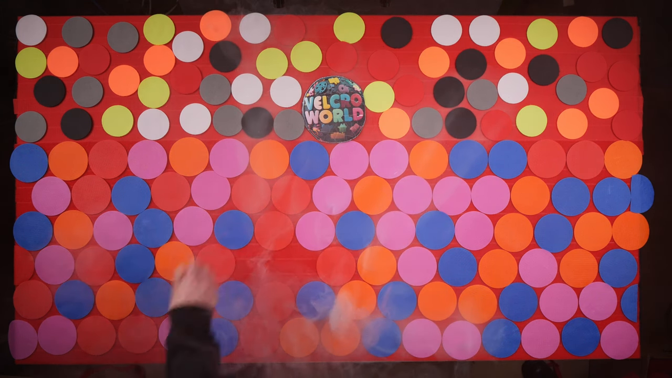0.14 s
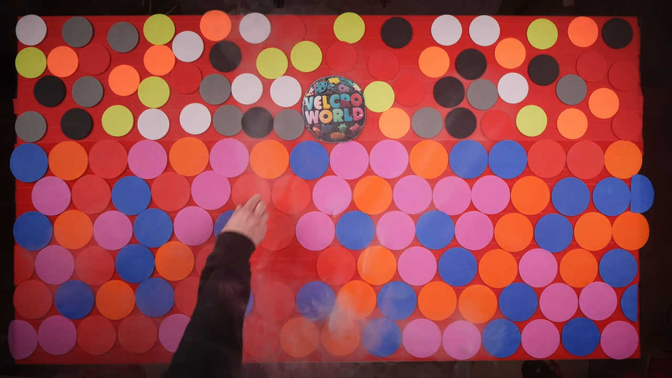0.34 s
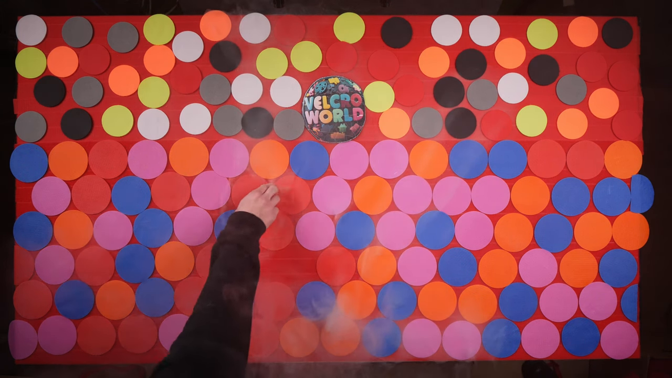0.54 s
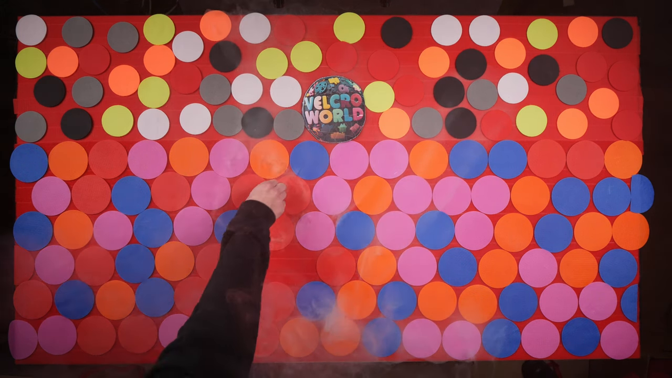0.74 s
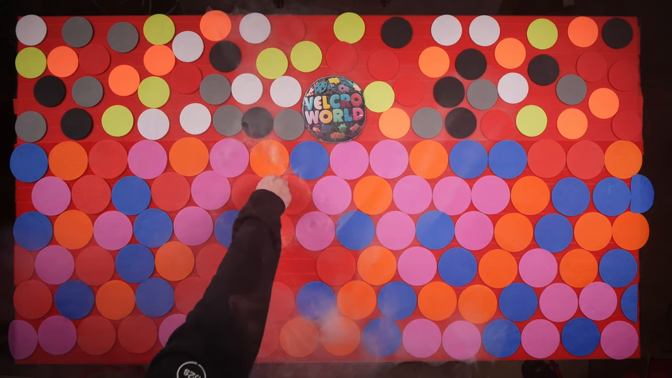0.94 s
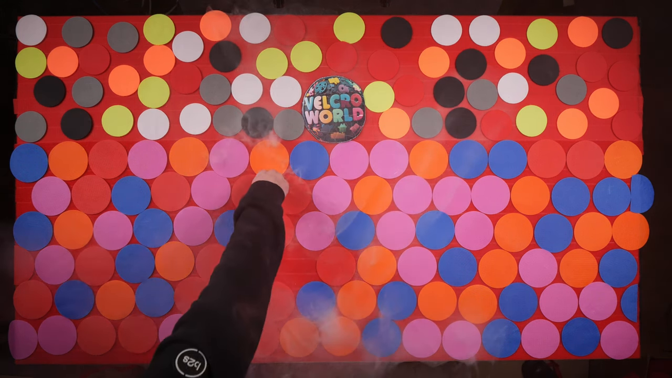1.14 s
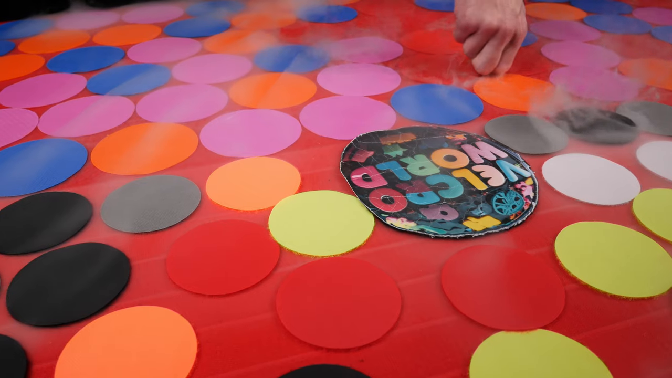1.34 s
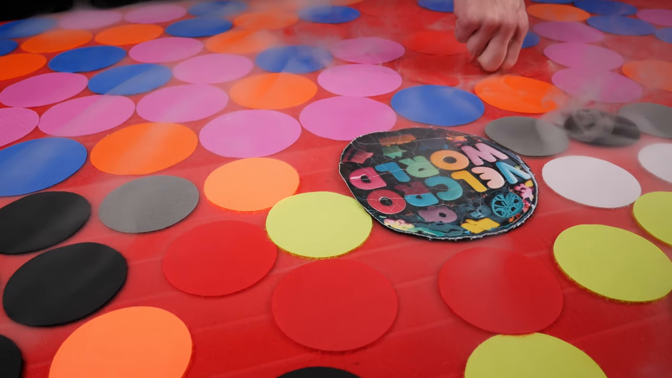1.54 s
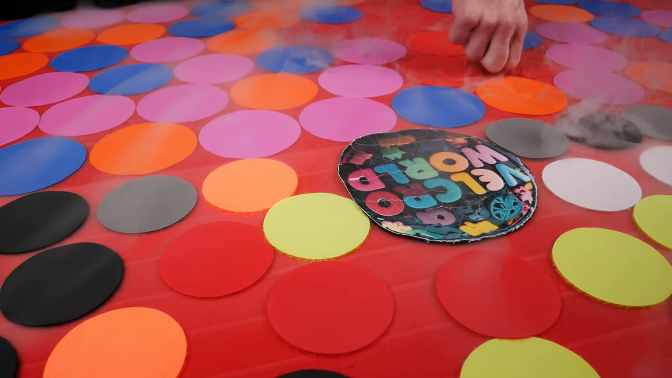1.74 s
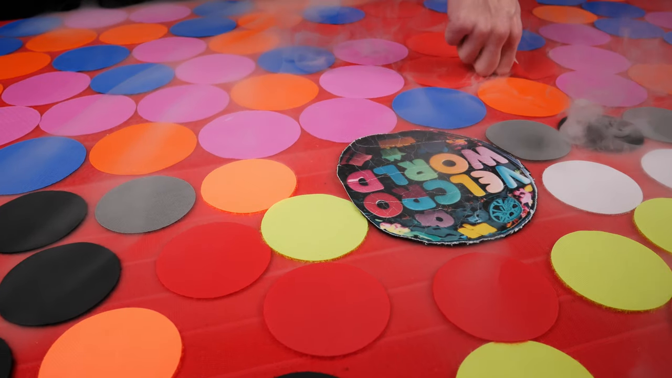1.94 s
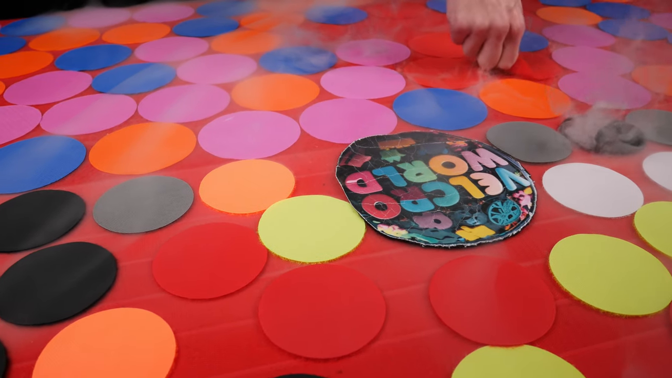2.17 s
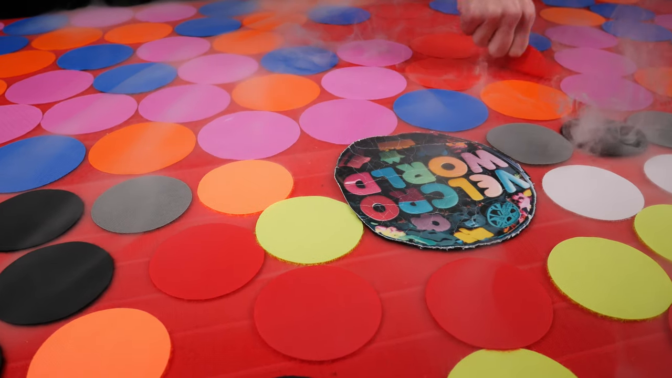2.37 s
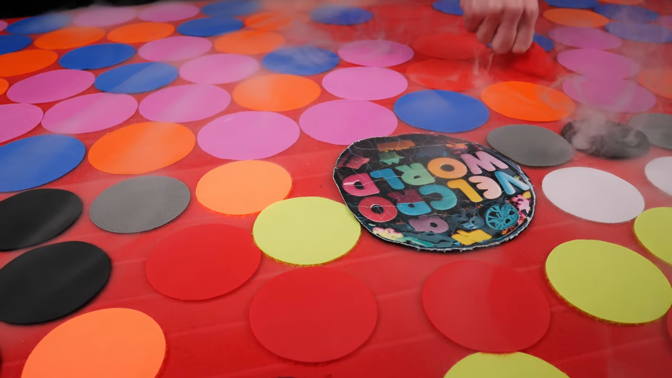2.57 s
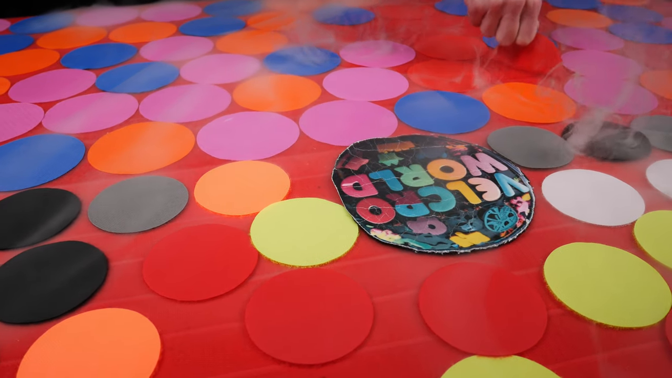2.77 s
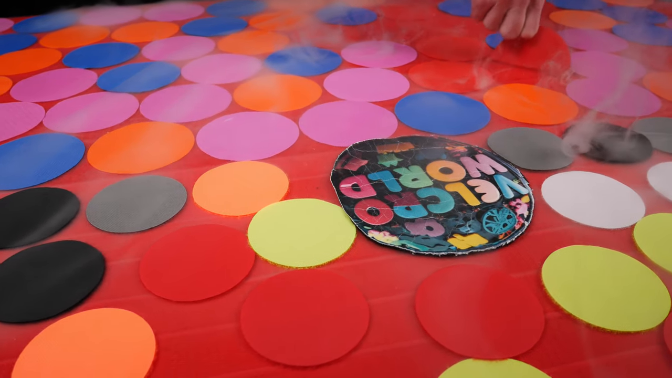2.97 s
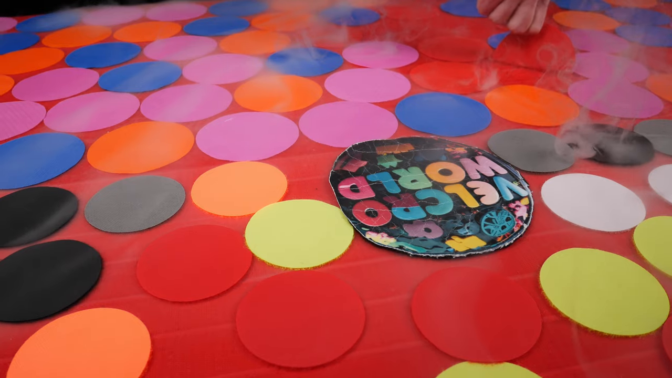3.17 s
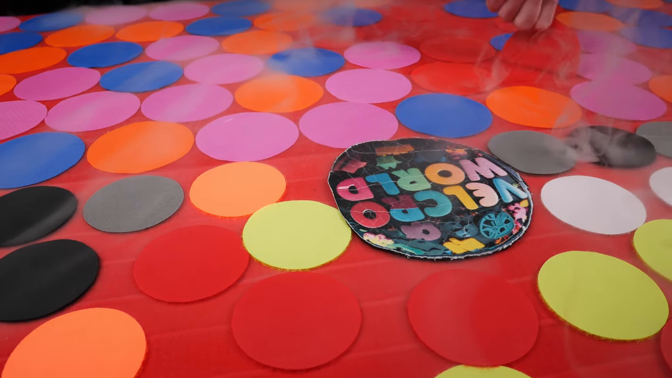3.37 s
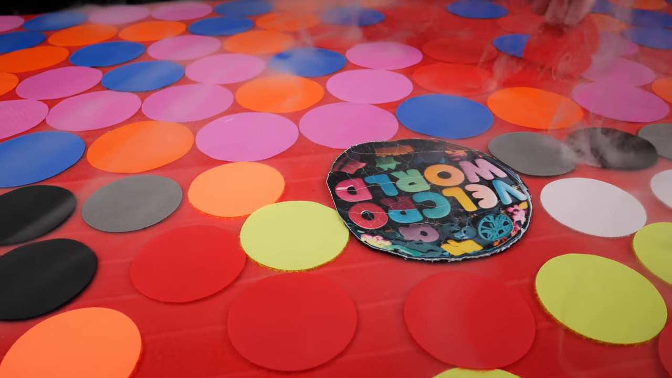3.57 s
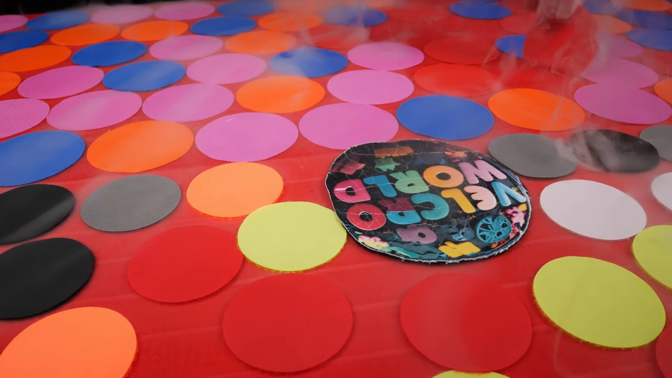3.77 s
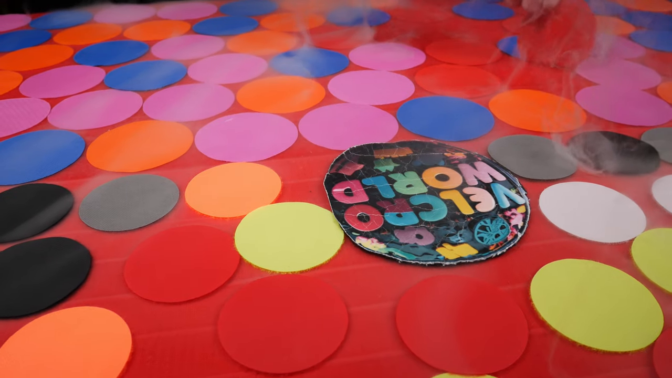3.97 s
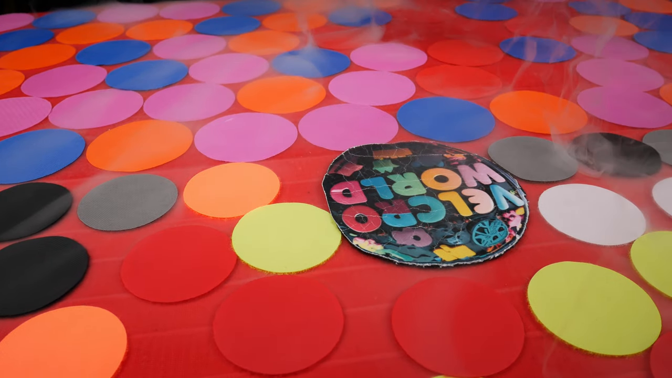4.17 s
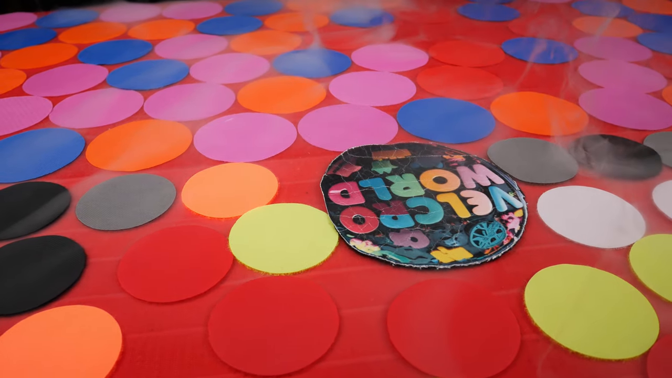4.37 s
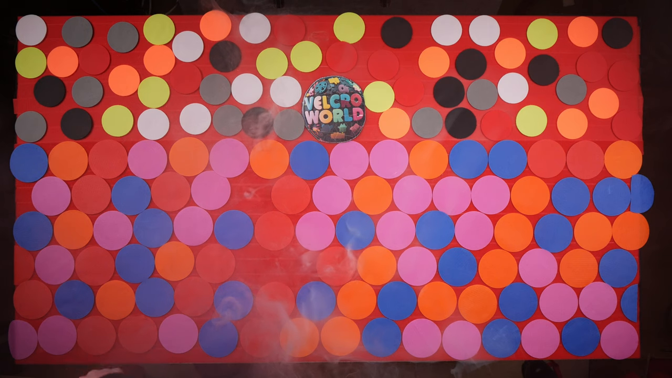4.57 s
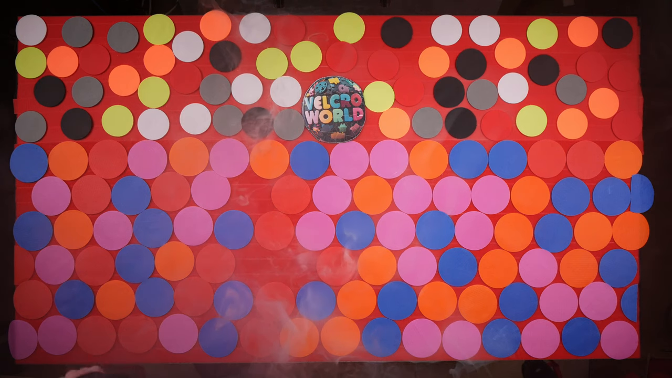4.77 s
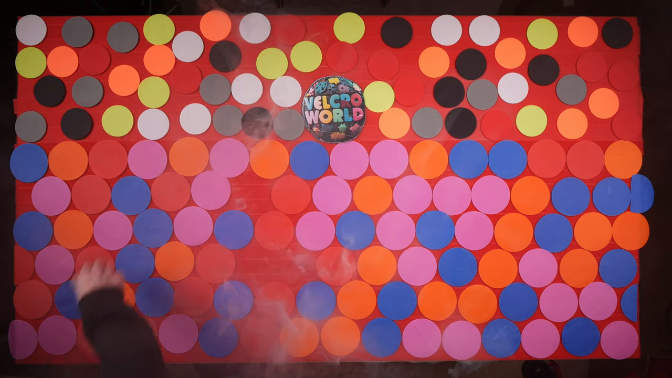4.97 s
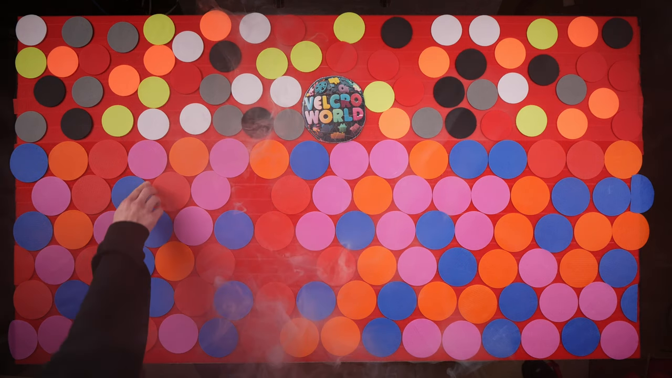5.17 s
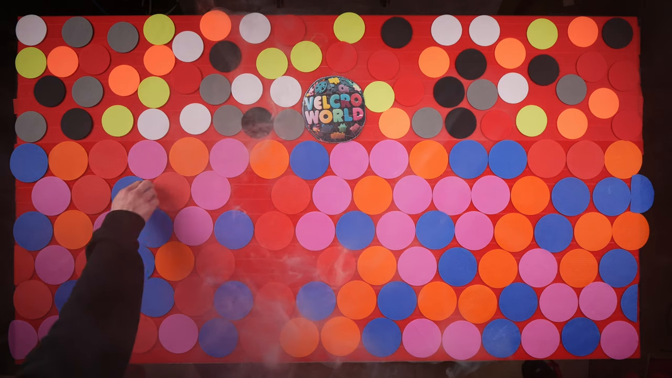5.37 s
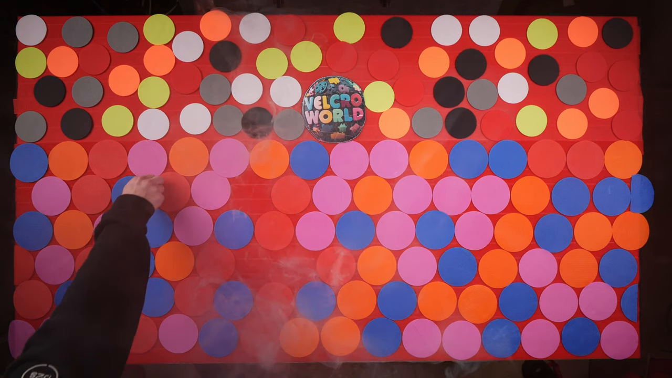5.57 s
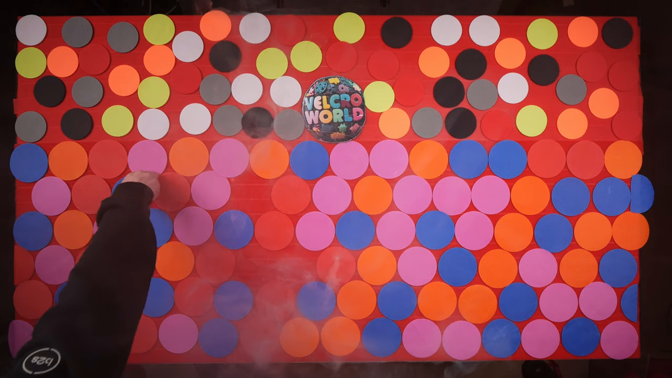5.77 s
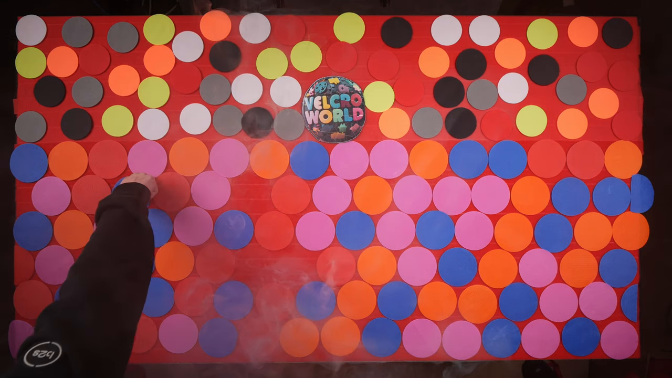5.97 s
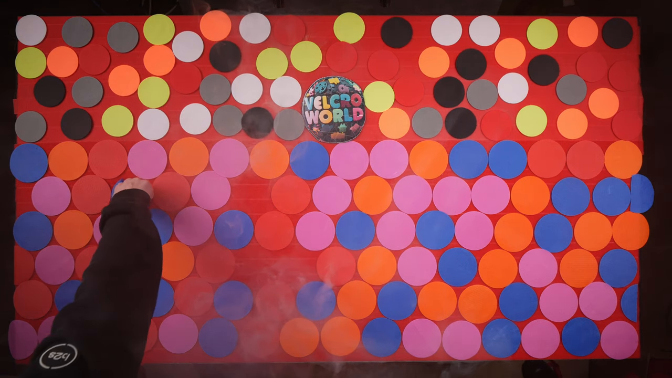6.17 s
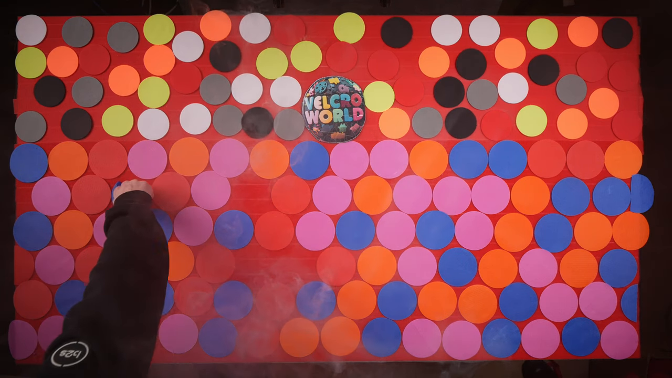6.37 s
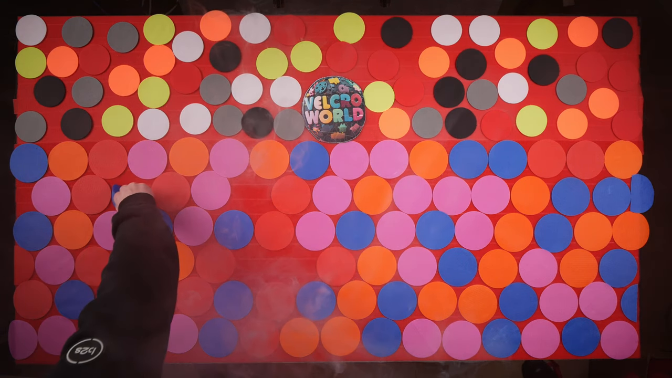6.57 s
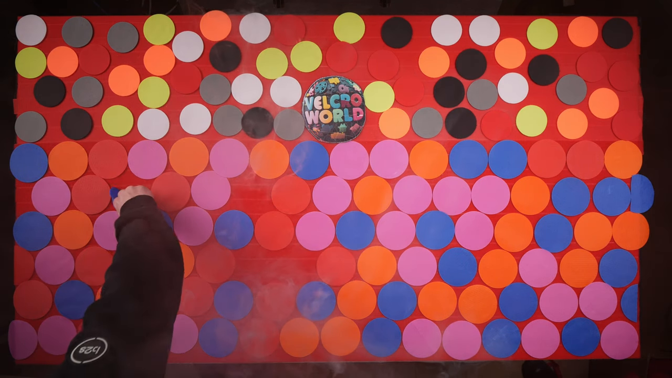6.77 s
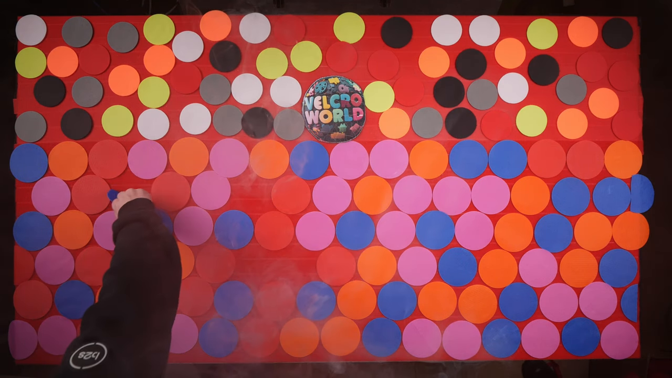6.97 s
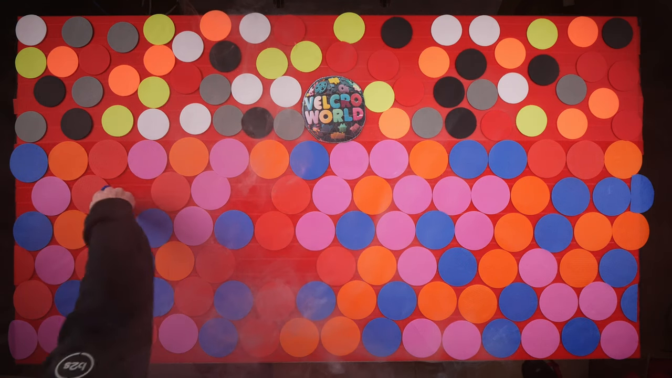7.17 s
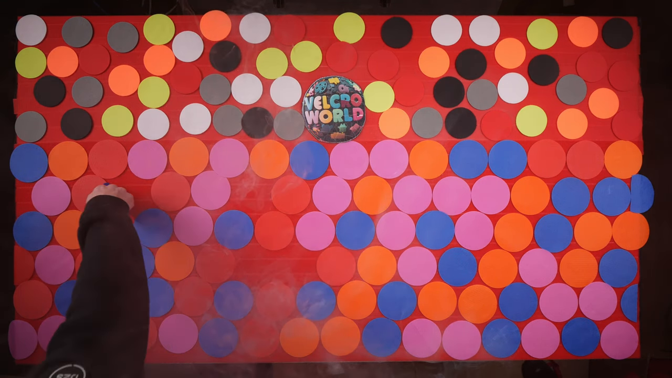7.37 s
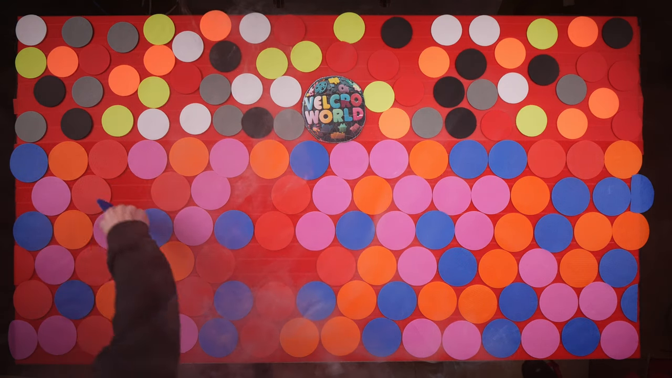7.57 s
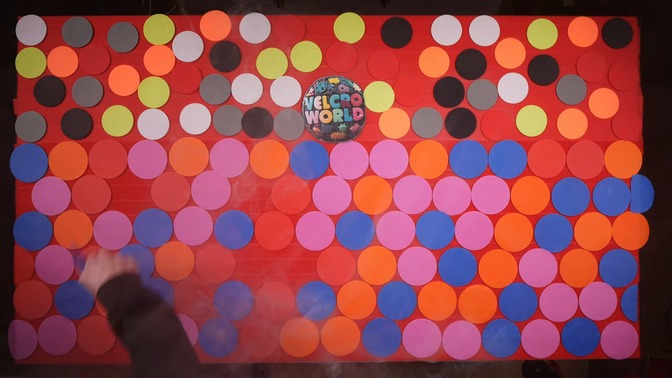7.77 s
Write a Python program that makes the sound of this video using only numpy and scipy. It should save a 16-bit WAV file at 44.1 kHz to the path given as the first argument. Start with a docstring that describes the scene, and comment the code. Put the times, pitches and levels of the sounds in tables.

```python
"""Faint rubbing and stray ticks, then the rasp of round hook-and-loop patches peeled off a board in
short pulls, close to two spaced microphones in a small dry room. Every hook that lets go snaps; the
lifted flap radiates lower as it grows, and the pocket under it rings in falling glides. The board thuds
and sways, and fingertips and a sleeve rustle between the pulls."""
import sys
import numpy as np
from scipy import signal
from scipy.fft import rfft, irfft
from scipy.io import wavfile
from scipy.ndimage import uniform_filter1d

SR = 44100
rng = np.random.default_rng(int(sys.argv[2]) if len(sys.argv) > 2 else 0)


def store_pcm(level_fs):
    """Save levels as 16-bit WAV."""
    pcm = np.round(np.clip(level_fs, -1, 1) * 32767).astype(np.int16)
    wavfile.write(sys.argv[1], SR, np.atleast_2d(pcm).T)


N = 345303
T = np.arange(N) / SR


def gain_of(db):
    """Decibels to gain."""
    return 10 ** (np.asarray(db) / 20)


def unit_rms(x):
    """Scales to rms 1."""
    return x / np.sqrt(np.mean(x ** 2) + 1e-20)


def at_hz(table, hz):
    """Value of a spectrum table at hz."""
    freq_hz, value = np.transpose(table)
    return np.interp(np.log(hz + 1), np.log(freq_hz + 1), value)


def curves(rows, t):
    """Columns of a table at the times t."""
    time_s, *columns = np.transpose(rows)
    return [np.interp(t, time_s, column) for column in columns]


def envelope(events):
    """Gain of several (time_s, level_db) lists on one time line, silent between them."""
    gain = np.full(N, 1e-10)
    for rows in events:
        span = slice(*np.searchsorted(T, [rows[0][0], rows[-1][0]]))
        gain[span] = np.maximum(gain[span], gain_of(curves(rows, T[span])[0]))
    return gain


def shortest_impulse(db):
    """Minimum-phase impulse of energy 1 with the spectrum db on 1025 bins."""
    log_gain = np.log(gain_of(np.concatenate([db, db[-2:0:-1]])))
    impulse = np.fft.ifft(np.exp(np.conj(signal.hilbert(log_gain)))).real[:1024]
    return impulse / np.linalg.norm(impulse)


def noise_pair(spectrum, alike):
    """Noise of one spectrum, partly alike at the two microphones."""
    left, other = rng.standard_normal((2, N))
    right = alike * left + np.sqrt(1 - alike ** 2) * other
    tone = gain_of(at_hz(spectrum, np.fft.rfftfreq(N, 1 / SR)))
    return unit_rms(irfft(rfft([left, right]) * tone, N))


# The quiet room all around the microphones: freq_hz, density_db
AIR_SPECTRUM = [(26, -39), (45, -20), (96, -17), (158, -15.5), (174, -31), (245, -19.5), (476, -30),
                (741, -40), (16000, -53.5)]

def room_air():
    """A steady, very faint rumble and hiss."""
    return gain_of(-87.5) * noise_pair(AIR_SPECTRUM, alike=0.74)


# Decay of the small room around the board: freq_hz, t60_s
ROOM_DECAY = [(200, 0.24), (1000, 0.089), (4000, 0.11), (9000, 0.045), (14000, 0.033)]

def room_reflections(direct):
    """The walls return sparse echoes of random sign, each band dying at its own speed."""
    length = SR // 3
    taps = np.zeros((2, length))
    at = np.arange(60, length - 20, 20) + rng.integers(0, 20, (2, (length - 61) // 20))
    np.put_along_axis(taps, at, rng.choice([-1., 1.], at.shape), 1)
    hz, t, bands = signal.stft(taps, SR, nperseg=128)
    decay = gain_of(-60 * t / at_hz(ROOM_DECAY, hz)[:, None])
    tail = signal.istft(bands * decay, SR, nperseg=128)[1]
    upper = signal.lfilter(*signal.butter(2, 500, "high", fs=SR), direct)  # the bass stays close and dry
    return signal.fftconvolve(upper, tail / np.linalg.norm(tail[0]), axes=1)[:, :N]


# Where the peeling edge sits between the microphones: time_s, right_lag_ms, left_lead_db
EDGE_PLACES = [(.7, 0.2, 0.5), (2.1, .2, -1.5), (3.6, 0.27, 1.5), (4.4, .25, -.5), (5.3, .39, 1),
               (6.1, 0.41, 2), (7.8, .44, 2)]

def edge_place(t):
    """Lag in samples at the right microphone and extra dB at the left, at the times t."""
    lag_ms, lead_db = curves(EDGE_PLACES, t)
    return lag_ms * SR / 1000, lead_db


# Faint rubs at the board that swell and fade: on_s, fade_from_s, off_s, level_db
# With fade_from_s before on_s a rub only fades; with off_s before on_s it is silent.
RUBS = [(0.514, 0.51, 1.1, -78), (0.719, 0.715, 1.14, -69), (0.915, 0.95, 1.5, -73),
        (1.075, 1.09, 1.6, -60.5), (1.74, 1.73, 5.8, -73), (4.24, 4.3, 4.48, -67.5),
        (4.441, 4.448, 4.55, -70.5), (4.695, 4.774, 4.98, -61), (5.383, 5.402, 5.45, -73.5),
        (5.473, 5.497, 5.8, -71), (7.7, 7.71, 8.04, -65.5), (7.74, 7.832, 6.2, -66)]
# Sleeve cloth at the microphones: freq_hz, density_db
CLOTH_SPECTRUM = [(120, -58), (200, -21), (529, -14), (647, -3.5), (867, -32.5), (933, -4), (6170, -3),
                  (16000, -17.5)]
# Fingertips at the microphones: freq_hz, density_db
SKIN_SPECTRUM = [(410, -55), (700, -19), (1620, -16), (2080, -5), (3790, -15), (5190, -8), (16000, -25)]

def rustle(sleeve_from_s=4.6, sleeve_to_s=5.1):
    """Cloth or skin rubs: noise that flickers in short grains, later and softer on the right."""
    grain = gain_of(4.6 * unit_rms(uniform_filter1d(rng.standard_normal(N), 150)))
    cloth, skin = noise_pair(CLOTH_SPECTRUM, alike=0.4), noise_pair(SKIN_SPECTRUM, alike=0.62)
    rub = np.where((T > sleeve_from_s) & (T < sleeve_to_s), cloth, skin)
    level = envelope([[(on, db - 8), (fade, db), (off, db - 30)] for on, fade, off, db in RUBS])
    left, right = uniform_filter1d(level, 60) * unit_rms(grain) * rub
    lag, _ = edge_place(T)
    delayed = np.maximum(np.arange(N) - np.round(lag).astype(int), 0)
    return np.array([left * gain_of(6.0), right[delayed] * gain_of(4.5)])


# Swells of the board's deep rumble, close to the microphones: time_s, level_db
RUMBLE_SWELLS = [(0.028, -65), (0.529, -47), (0.98, -51), (1.33, -46.5), (1.55, -38), (1.98, -50),
                 (2.44, -31.5), (2.57, -35), (2.76, -40), (3.03, -36), (3.15, -42), (3.56, -33.5),
                 (3.75, -33), (4.0, -27.5), (4.13, -21), (4.85, -65), (5.36, -59), (5.75, -59), (6.13, -37),
                 (6.27, -35), (7.07, -35), (7.33, -33.5), (7.6, -37), (7.76, -40.5)]
# The board's wobble, nearly the same at both microphones: freq_hz, density_db
SWAY_SPECTRUM = [(12, -15), (22, -1.5), (29, 16), (36, -1.5), (45, -9), (55, -2.5), (75, -20.5), (120, -53)]

def board_sway(fall_db_per_s=80, rise_s=0.07, rest_db=-73.5):
    """Deep wobble of the board: it rises with the pulls and the listed swells and dies slowly."""
    drive_db = 20 * np.log10(pull_force()) - 21  # well below the crackle
    time_s, level_db = np.transpose(RUMBLE_SWELLS)
    drive_db[np.minimum(np.round(time_s * SR).astype(int), N - 1)] = level_db
    fall_db = fall_db_per_s * T
    held = gain_of(np.maximum.accumulate(drive_db + fall_db) - fall_db) + gain_of(rest_db)
    wobble = noise_pair(SWAY_SPECTRUM, alike=0.985)
    return uniform_filter1d(held, round(rise_s * SR)) * wobble * gain_of([[.5], [-.5]])


# Modes of the board under the patches: pitch_hz, level_db, t60_s
BOARD_MODES = [(131, -2.5, 0.091), (277, -10, 0.013), (380, 12.5, 0.022), (560, 2.5, 0.027),
               (800, 9.5, 0.0038), (1070, 0, 0.0016), (1410, -6.5, 0.013)]

def board_thud(snaps):
    """The snaps knock the board's damped modes, louder at the left microphone."""
    t = T[:8000]
    ring = sum(gain_of(db - 60 * t / t60) * np.cos(2 * np.pi * hz * t) for hz, db, t60 in BOARD_MODES)
    thud = signal.oaconvolve(snaps, ring[None] / np.linalg.norm(ring), axes=1)[:, :N]
    return thud * gain_of([[1.5], [-1.5]])


# Glides of the pocket just under the flap: start_s, end_s, from_hz, to_hz, end_gain_db
POCKET_GLIDES = [(2.302, 2.58, 1250, 680, -22), (2.645, 2.88, 1090, 670, -17), (2.9, 3.44, 840, 560, -14.5),
                 (3.5, 3.7, 514, 389, -2.5), (3.807, 4.196, 380, 247, -8.5), (6.22, 6.72, 710, 368, -13.5),
                 (6.78, 6.92, 800, 605, -15), (6.995, 7.232, 770, 254, 0), (7.5, 7.703, 330, 213, -3)]

def pocket_ring(snaps, width_hz=160, swell_db=3):
    """The snaps ring the pocket, which swells and falls in pitch as it opens."""
    gain = envelope([[(start, db - swell_db), (end, db)] for start, end, _, _, db in POCKET_GLIDES])
    log_pitch = []
    for start, end, from_hz, to_hz, _ in POCKET_GLIDES:
        log_pitch += [(start, np.log(from_hz)), (end, np.log(to_hz))]
    pitch_hz = np.exp(curves(log_pitch, T)[0])
    # a moving resonance: shift the pitch down to zero, smooth, shift back
    carrier = np.exp(2j * np.pi * np.cumsum(pitch_hz) / SR)
    pole = np.exp(-np.pi * width_hz / SR)
    ring = carrier * signal.lfilter([1 - pole], [1, -pole], snaps * gain / carrier)
    return np.sqrt(2 * (1 + pole) / (1 - pole)) * ring.real  # keeps the energy of a click


# A snap on a free flap, heard close: freq_hz, density_db
FLAP_SPECTRUM = [(60, -58.5), (150, -15), (400, 19), (1000, 9), (2500, 8), (4500, 7.5), (7000, -1),
                 (10000, -9), (13000, -12), (16000, -14)]

def flap(snaps, lifted, crisp, sizes=9):
    """The snaps jerk the flap, which radiates above a corner that sinks as more is lifted."""
    fizz = signal.lfilter(*signal.butter(2, 7000, "high", fs=SR), snaps)
    bright = snaps + (crisp + [[.2], [0]]) * fizz  # the left microphone faces the edge more
    size_now = np.clip(lifted, 0, 1) * (sizes - 1)
    hz, radiated = np.fft.rfftfreq(2048, 1 / SR), np.zeros((2, N))
    for size in range(sizes):
        corner_hz = 4200 * 0.045 ** (size / (sizes - 1))
        ratio = (hz + 1) / corner_hz
        highpass = ratio ** 2 / abs(1 - ratio ** 2 + 1j * ratio / 0.99)
        impulse = shortest_impulse(at_hz(FLAP_SPECTRUM, hz) + 20 * np.log10(highpass + 0.13))
        share = np.maximum(1 - abs(size_now - size), 0)
        radiated += signal.oaconvolve(bright * share, impulse[None], axes=1)[:, :N]
    return radiated


# The hand's force, heard close as crackle, one list a pull: time_s, level_db
HAND_PULLS = [
    [(0.76, -70), (0.795, -50.5), (0.85, -56.5)],
    [(1.124, -45.5), (1.23, -47.5), (1.255, -31), (1.31, -37.5), (1.325, -27.5), (1.375, -32)],
    [(1.398, -36.5), (1.455, -36.5)],
    [(1.484, -27), (1.505, -40), (1.525, -25), (1.585, -30.5), (1.605, -23.5), (1.66, -29), (1.69, -30),
     (1.725, -32.5)],
    [(1.88, -37.5), (1.92, -45.5), (1.94, -55)],
    [(1.99, -52), (2.1, -64.5)],
    [(2.12, -61), (2.15, -33.5), (2.31, -25), (2.428, -17), (2.57, -28.5)],
    [(2.63, -49.5), (2.66, -21.5), (2.79, -19), (2.825, -27.5), (2.85, -22.5), (2.93, -27.5), (2.97, -19),
     (3.06, -24), (3.19, -26.5)],
    [(3.213, -20), (3.276, -34), (3.35, -23.5), (3.418, -25.5)],
    [(3.46, -36), (3.551, -16), (3.61, -19), (3.675, -23.5)],
    [(3.8, -29), (3.87, -20.5), (3.95, -25.5), (4.055, -24.5)],
    [(4.088, -22.5), (4.13, -18.5), (4.195, -18)],
    [(5.54, -40.5), (5.585, -45)],
    [(5.695, -33.5), (5.769, -70)],
    [(5.805, -39.5), (5.9, -34.5), (5.99, -42.5), (6.07, -35), (6.1, -29.5), (6.13, -32.5), (6.19, -26),
     (6.31, -35.5), (6.595, -30)],
    [(6.63, -45), (6.73, -41), (6.75, -27.5), (6.81, -30.5), (6.918, -33.5), (6.95, -43)],
    [(6.995, -36), (7.1, -25), (7.255, -35.5), (7.35, -31.5), (7.385, -48.5)],
    [(7.488, -42), (7.53, -29.5), (7.6, -29), (7.65, -31), (7.69, -31.5)],
]

def pull_force(bite_s=0.0034, let_go_s=0.024, drop_db=23.5):
    """Gain of the pulls: each bites at once and dies quickly as the hand lets go."""
    pulls = []
    for rows in HAND_PULLS:
        (start, start_db), (end, end_db) = rows[0], rows[-1]
        pulls.append([(start - bite_s, start_db - drop_db), *rows, (end + let_go_s, end_db - drop_db)])
    return envelope(pulls)


# Single snaps at the edge, from loud hooks to stray fibres in the pauses: time_s, level_db
SINGLE_SNAPS = [(0.5162, -41), (0.5809, -42), (0.7277, -40), (0.7542, -25.5), (0.7735, -14), (0.796, -19),
                (0.8143, -11), (0.933, -37), (0.9512, -33), (0.9728, -31.5), (1.027, -42), (1.066, -46),
                (1.0894, -23.5), (1.121, -10), (1.1342, -18), (1.1543, -10.5), (1.176, -11), (1.1903, -21),
                (1.2178, -13), (1.2542, -8.5), (1.2858, -4), (1.3231, 3), (1.3984, -2), (1.4125, -2),
                (1.4278, -25), (1.4443, -5.5), (1.4852, -10), (1.5216, -2), (1.596, -18), (1.652, 2.5),
                (1.7023, -6), (1.8388, -38), (1.8812, -41), (2.0306, -33), (2.0857, -26), (2.115, -29),
                (2.1247, -7.5), (2.1433, -16), (2.1561, -0.5), (2.212, -7), (2.5558, 0), (2.5939, -12),
                (2.6224, -8.5), (2.8877, -3), (3.2884, 3), (3.446, -11.5), (3.4553, 0), (3.4652, -12),
                (3.4815, -1.5), (3.6733, 4), (3.6898, -8), (3.778, -28), (3.792, -33), (3.8062, -10),
                (3.875, 0), (4.2594, -27), (4.2884, -49), (4.3116, -38), (4.3444, -46.5), (4.397, -48.5),
                (4.418, -58), (4.4433, -45), (4.694, -50), (4.8878, -60), (4.9342, -52), (5.2826, -47.5),
                (5.3976, -49.5), (5.4907, -29), (5.5137, -40), (5.5365, -17), (5.5663, -14), (5.579, -18.5),
                (5.677, -38), (5.7007, -15), (5.7194, -41), (5.7331, -16), (5.7613, -19.5), (5.7892, -28.5),
                (5.805, -33), (5.8316, -9), (5.8814, -31), (5.9002, -12), (5.9538, -12), (6.0124, -16),
                (6.332, -10), (6.6266, -6), (6.6414, -17), (6.664, -12), (6.689, -3), (6.9485, -15.5),
                (6.9936, -11), (7.0059, -3), (7.0186, -4), (7.3873, -12.5), (7.4845, -16.5), (7.4998, -20),
                (7.6567, 0.5), (7.67, 2), (7.7055, -30)]

def hook_releases():
    """Sample and size of every release: a clumped random crowd and the single snaps."""
    force = pull_force()
    clumps = np.clip(unit_rms(uniform_filter1d(rng.standard_normal(N), 250)), -3, 1.5)
    chance = np.clip(12000 * force ** .45, 200, 9000) / SR  # a harder pull frees more hooks a second
    crowd = np.flatnonzero((rng.random(N) < chance) & (force > gain_of(-100)))
    spread = np.minimum(rng.exponential(1, N), 2.5)
    size = unit_rms(gain_of(4.75 * spread + 3.15 * clumps)) * force / np.sqrt(chance)
    time_s, level_db = np.transpose(SINGLE_SNAPS)
    at = np.append(crowd, np.round(time_s * SR).astype(int))
    return at, -np.append(size[crowd], gain_of(level_db))


def hook_snaps(kinds=12):
    """Each release rings one of several kinds of hook, with its own colour towards each microphone."""
    at, size = hook_releases()
    lag, lead_db = edge_place(at / SR)
    scatter = 0.64 * rng.standard_normal(N)[at] + rng.random(N)[at]  # hooks sit apart along the edge
    at_right = np.minimum(at + np.floor(lag + scatter).astype(int), N - 1)
    kind_of = rng.integers(0, kinds, N)[at]
    sides = size * gain_of([lead_db / 2, -lead_db / 2])
    hz, snaps = np.fft.rfftfreq(2048, 1 / SR), np.zeros((2, N))
    for kind in range(kinds):
        ripples = unit_rms(uniform_filter1d(rng.standard_normal((3, len(hz))), 35))
        common, left, right = ripples * hz / (hz + 2000)
        slip = rng.standard_normal(24) * np.exp(-np.arange(24) / 6.0)  # the loop slips off in a few jerks
        slip[0] = 1.4
        for side, arrival, own in ((0, at, left), (1, at_right, right)):
            ring = shortest_impulse(2.0 * common + 3.33 * own)[:256]
            snap = np.convolve(ring, slip / np.linalg.norm(slip))
            kicks = np.bincount(arrival, sides[side] * (kind_of == kind), N)
            snaps[side] += signal.oaconvolve(kicks, snap)[:N]
    return snaps


# Two patches in turn, close to the microphones: time_s, lifted_share, crisp_gain, board_coupling_db
PATCH_STATES = [(.8, 0.26, 1.4, -5), (.97, 0.12, 2.8, -2), (1.1, 0.14, 3.4, -8.5), (1.5, 0.06, 0.6, -13),
                (2.15, 0.09, 1.13, -10.5), (2.8, 0.51, 1.1, -15), (3.3, 0.63, 1.33, -8.5),
                (3.7, 0.62, 2.2, -21.5), (4.22, .85, 1.3, -19), (5.5, 0.3, 1.32, -13.5),
                (5.9, 0.32, 0.86, -10), (6.45, 0.58, 0.51, -14.5), (6.7, 0.61, 0.75, -28),
                (6.8, 0.63, 1.7, -5.5), (7.0, 0.62, 0.98, -14), (7.22, 0.94, 1.7, -11),
                (7.3, 0.64, 1.9, -6), (7.5, 0.88, 4.4, -8), (7.7, 1, 0.48, -1.5)]

def peel():
    """The snapping hooks drive the flap, the pocket under it and the board."""
    snaps = hook_snaps()
    lifted, crisp, coupling_db = curves(PATCH_STATES, T)
    return flap(snaps, lifted, crisp) + pocket_ring(snaps) + board_thud(snaps * gain_of(coupling_db))


def scene():
    """The close peeling over its reflections, the swaying board, the rustle and the quiet air."""
    patches = peel()
    return patches + gain_of(-12.5) * room_reflections(patches) + board_sway() + rustle() + room_air()


def record(dry, headroom=0.7, band_limit_hz=15900):
    """The microphones lose the lowest bass; the sharpest peaks are softly rounded off, then the band limit."""
    picked_up = signal.lfilter(*signal.butter(1, 14, "high", fs=SR), dry)
    rounded = headroom * np.tanh(picked_up / headroom)
    lowpass = signal.firwin(511, band_limit_hz, window=("kaiser", 9), fs=SR)
    return signal.oaconvolve(rounded, lowpass[None], "same", axes=1)


dry = scene()
out = record(dry)
store_pcm(out)
```